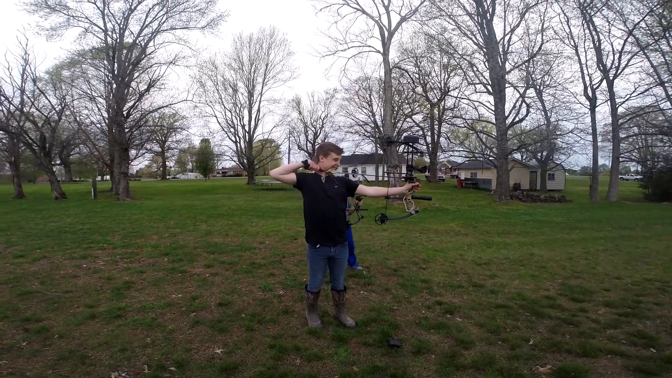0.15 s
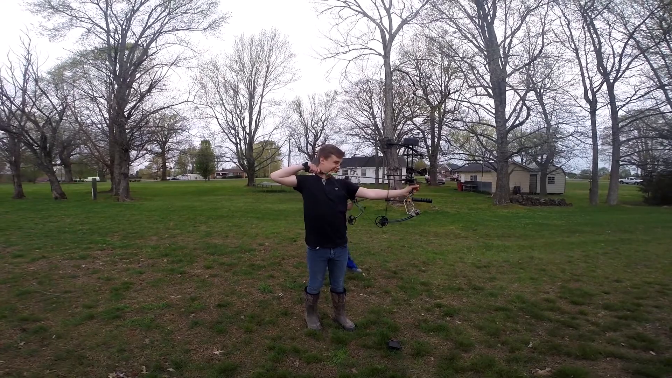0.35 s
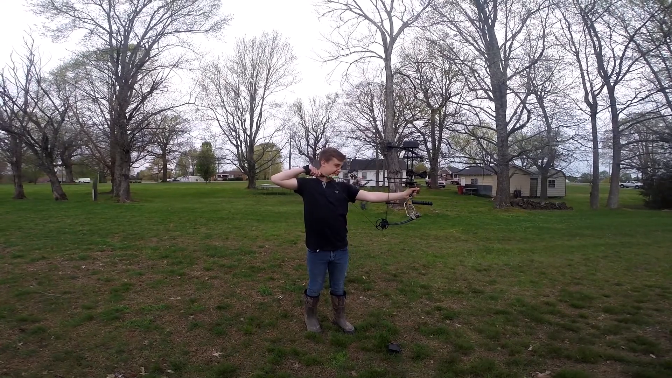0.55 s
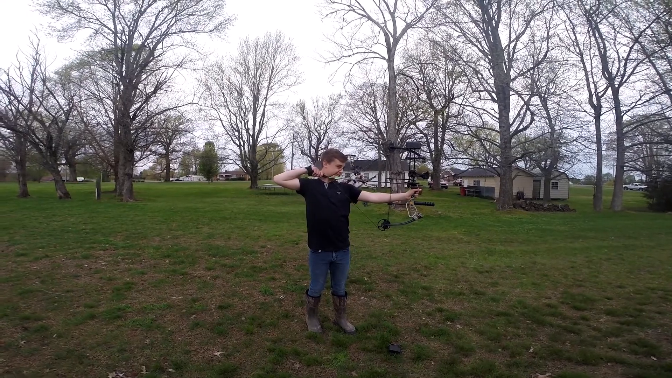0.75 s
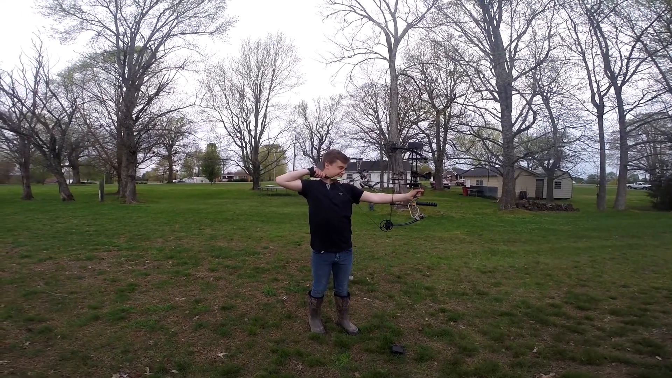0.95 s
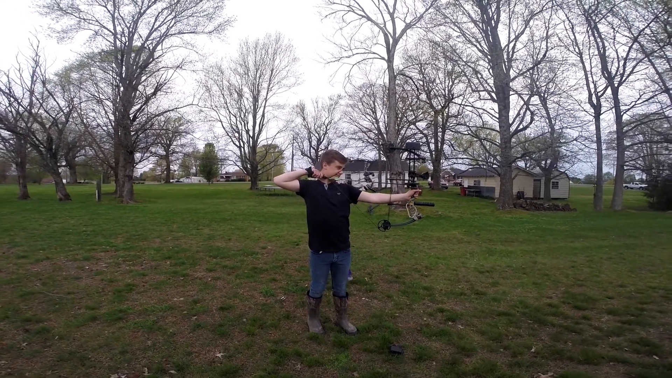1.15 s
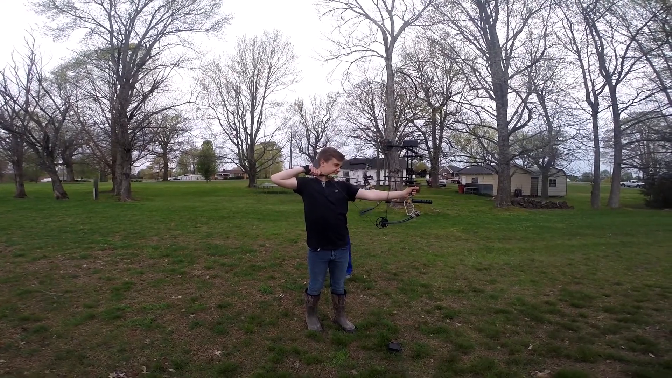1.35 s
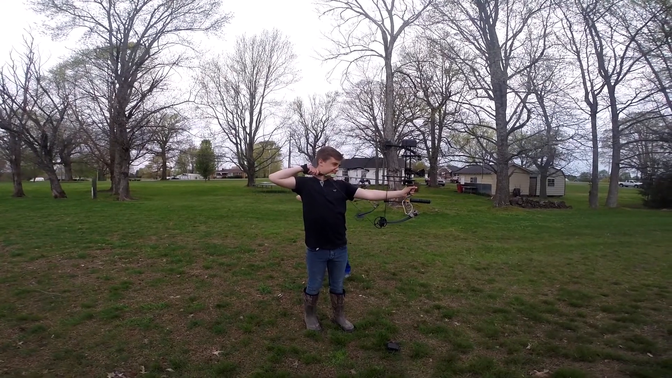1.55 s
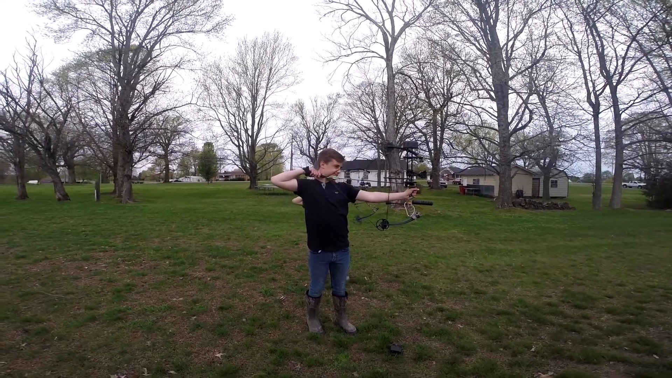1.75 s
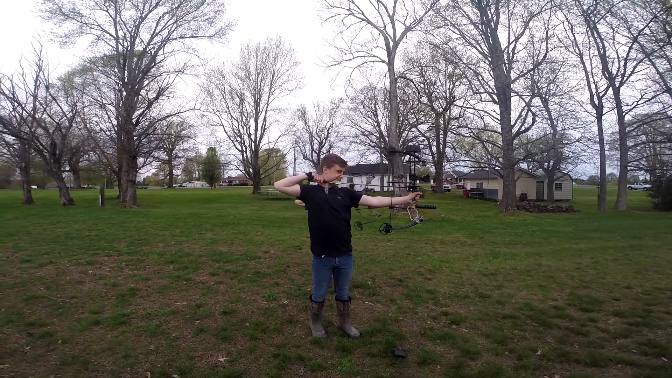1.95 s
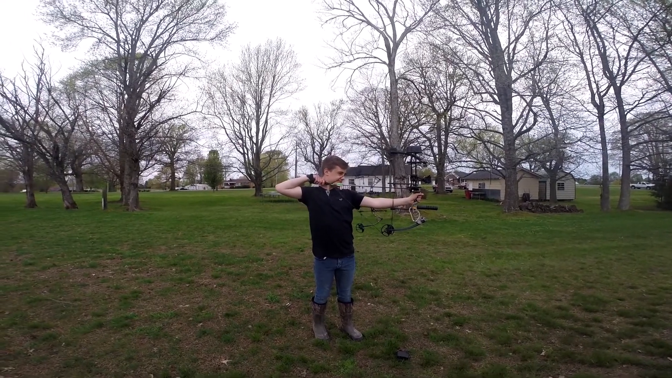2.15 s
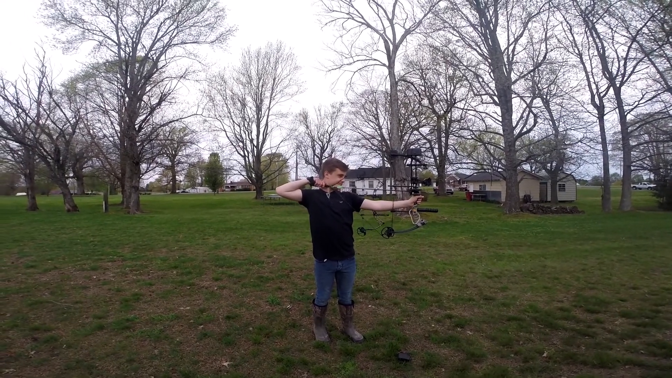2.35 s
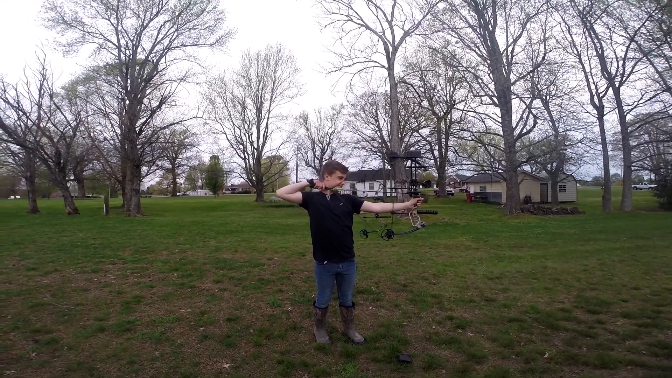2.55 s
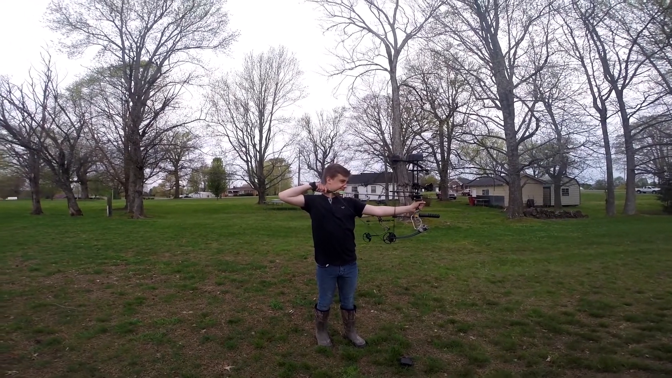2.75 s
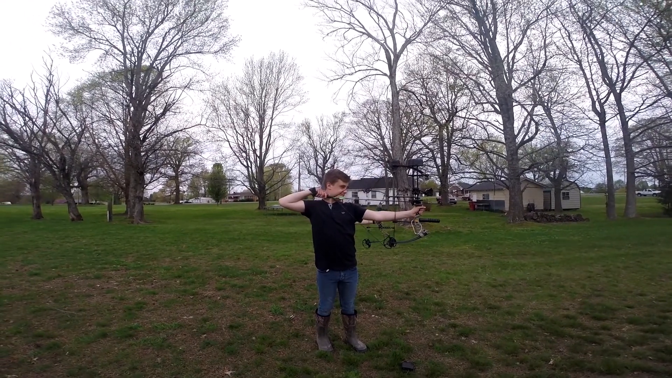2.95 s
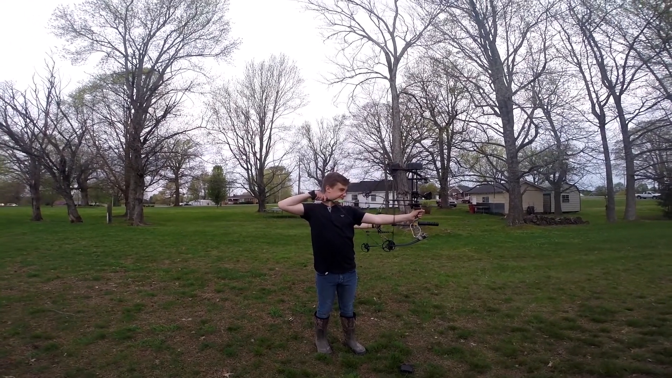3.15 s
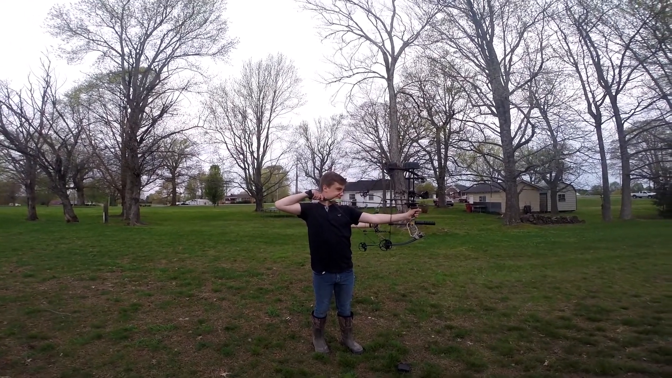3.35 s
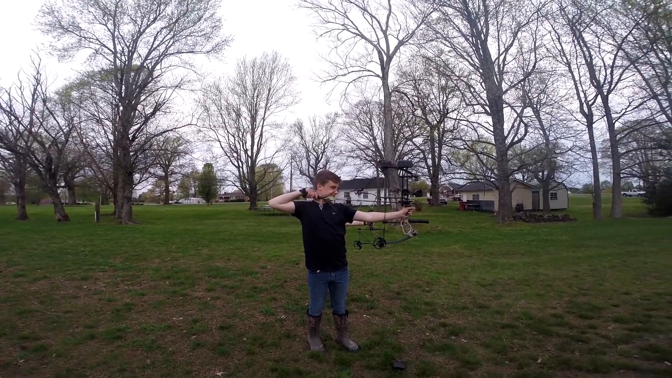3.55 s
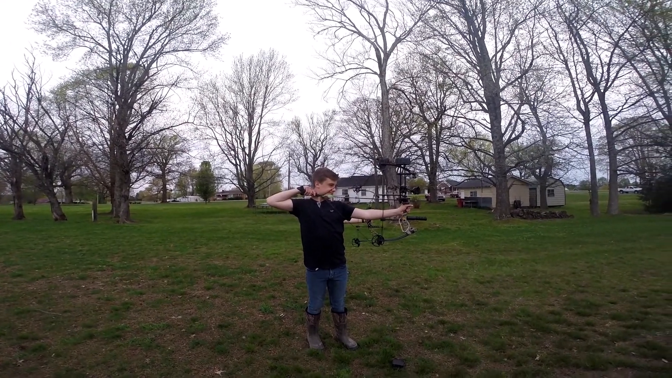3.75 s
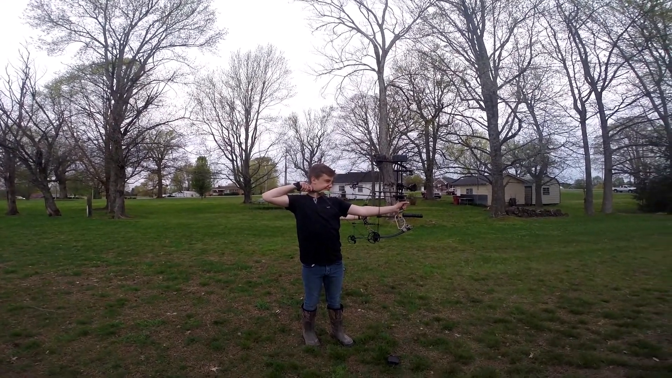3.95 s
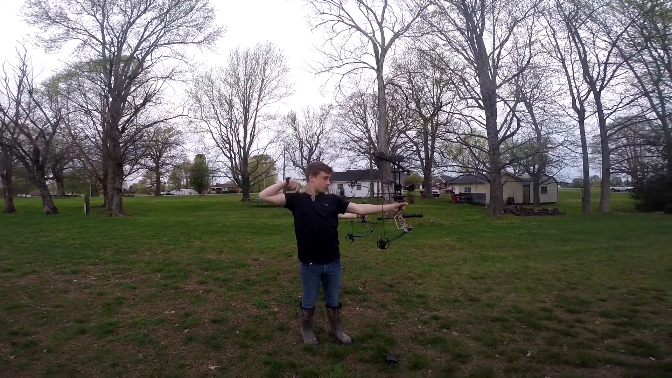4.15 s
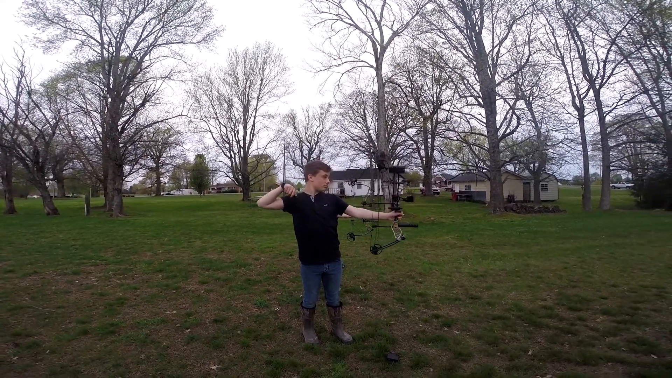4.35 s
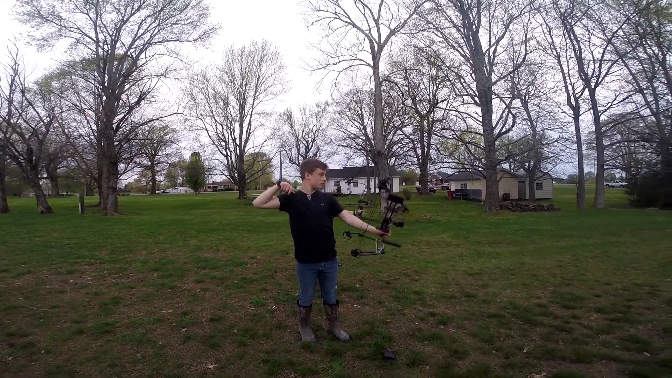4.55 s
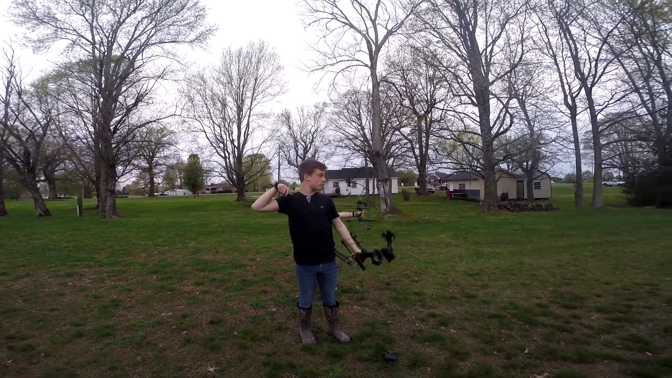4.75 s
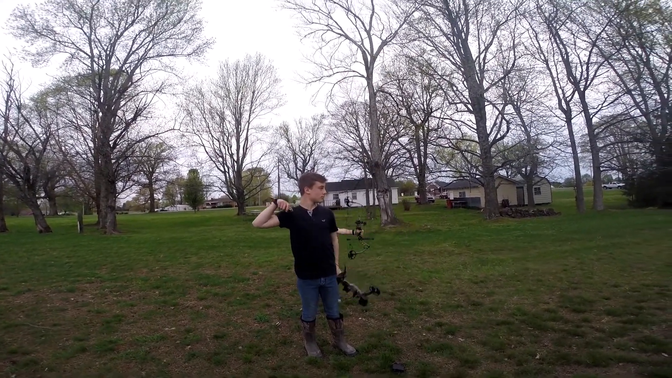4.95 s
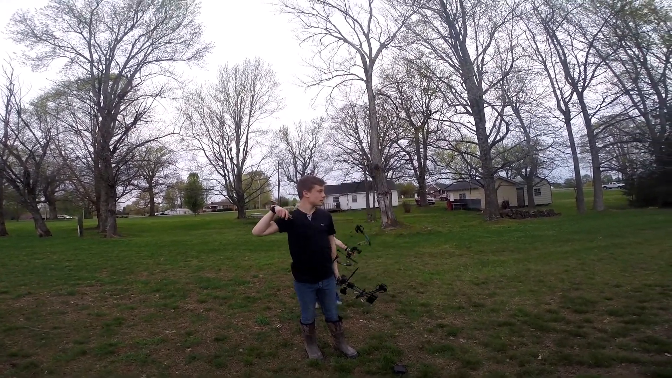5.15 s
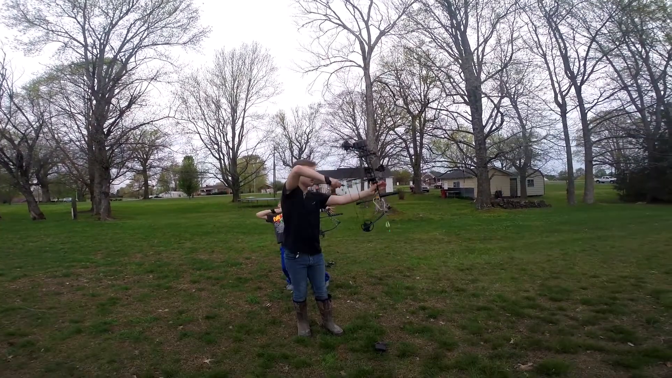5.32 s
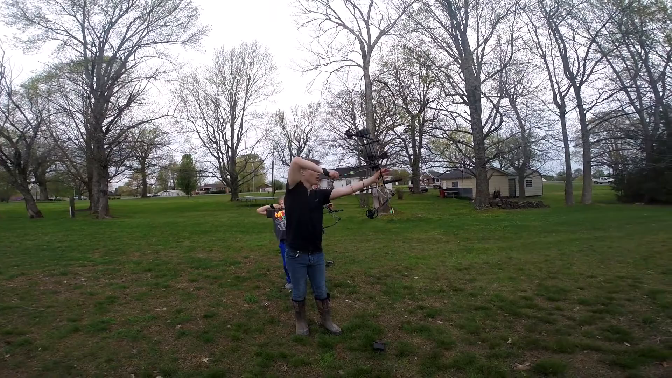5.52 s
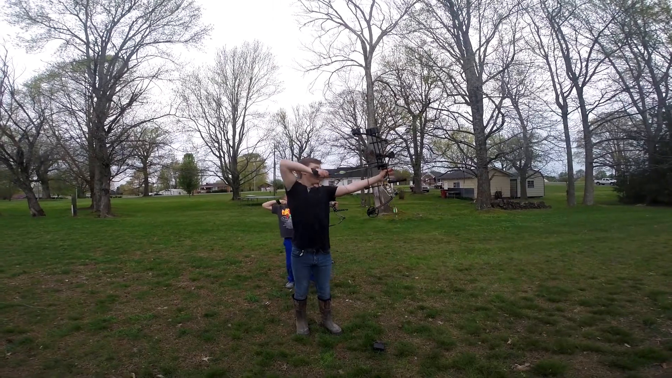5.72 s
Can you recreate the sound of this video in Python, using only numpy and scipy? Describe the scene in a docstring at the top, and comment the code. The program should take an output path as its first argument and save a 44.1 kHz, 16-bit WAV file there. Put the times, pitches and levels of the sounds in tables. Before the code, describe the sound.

A quiet open lawn: steady low rumble and soft midrange roar of distant traffic, swelling at the start and again around 1.4 s, with faint hiss and a barely audible high electronic whine. A sharp knock sounds close to the microphone at 0.05 s, more ticks and a small rustle near 0.95 s, and a cluster of clicks around 2.8 s. Small birds chip and whistle downward slurs; a rolling song repeats four times from 1.75 to 3 s. At 4.18 s a bow releases with a loud, hard slap, rattling and rebounding, leaving a short hum and scattered outdoor echoes. Its arrow hits a target at 4.45 s with a punchy thud. A second bow snaps at 4.8 s, quieter and tighter, and its arrow cracks home at 5.14 s. Sound immediately drops nearly to silence, returns around 5.25 s and creeps back up to background, with a tiny tick near 5.67 s.

```python
"""Two bow shots on a lawn

Two compound bows are released in turn: each slap rings limb modes, leaves a hum and shakes a noise rattle. Each
arrow thuds into a target down range: a push-and-spring pulse, cracks, short rings and echoes. Distant traffic
is shaped noise, birds are gliding sines; something small ticks and knocks near the microphone, and a release
aid clicks just before the first shot; the microphone's electronics whine faintly. After the last thud the sound
drops out and creeps back."""
import sys
import numpy as np
from scipy import signal
from scipy.fft import rfft, irfft
from scipy.io import wavfile
from scipy.ndimage import uniform_filter1d

SR = 44100
rng = np.random.default_rng(int(sys.argv[2]) if len(sys.argv) > 2 else 0)


def transcribe(signal):
    """Save signal, clipped to [-1, 1], as a 16-bit WAV file at the path in sys.argv[1]."""
    frames = np.atleast_2d(signal).T
    limited = np.clip(frames, -1, 1)
    pcm = np.round(limited * 32767).astype(np.int16)
    wavfile.write(sys.argv[1], SR, pcm)


N = 259286
TIME_S = np.arange(N) / SR

# background and hiss spectra, relative: freq_hz, density_db_per_hz
ROAR_SPECTRUM = [(700, -26), (950, -1), (1100, 1), (1300, 2.5), (1550, -4), (2000, -57.5)]
RUMBLE_SPECTRUM = [(20, -12.5), (40, -5), (70, 0), (115, 4), (160, -4.5), (250, -9.5), (400, -15.5),
                   (700, -40)]
SWISH_SPECTRUM = [(1200, -22.5), (1700, 8), (2400, 0.5), (3300, -3.5), (5000, -20), (9000, -31)]
DRONE_SPECTRUM = [(220, -24.5), (400, -10), (520, -4.5), (650, -2), (850, 1.5), (1100, -5.5)]
HISS_SPECTRUM = [(2000, -12), (5000, 5), (9000, -8), (12000, -12), (14800, -11), (16000, -22)]
# steady background and hiss levels, rms
ROAR_DB, RUMBLE_DB, SWISH_DB, DRONE_DB, HISS_DB = -51.5, -46, -58.5, -52.5, -67
# broad swells in the background: far vehicles, and a low tail after the first shot:
# centre_s, half_length_s, roar_gain_db, rumble_gain_db, swish_gain_db, drone_gain_db
SWELLS = [(0.0, 0.29, 6.5, 2.5, 3, 1), (1.4, 0.63, 4.5, -0.5, 1.5, 1), (1.887, 0.15, -2, 0.5, 3.5, 0.5),
          (3.047, 0.56, 1, -1, 4.5, -2.5), (4.56, 0.22, 0, 3.5, -1, 1.5), (5.0, 0.18, 0, 1.5, 3.5, -1),
          (5.85, 0.48, -1, -1, -1.5, 5.5)]
# microphone electronics: freq_hz, rms_db
WHINE = [(5860, -79.5), (8790, -88.5), (11719, -79.5), (14626, -79.5)]

# ticks and knocks (the two at 4.161 and 4.165 s are the release aid clicking before the first slap): # start_s,
# level_db, freq_hz, second_freq_hz, second_level_db, length_s
TICKS = [(0.0483, -15.5, 940, 3460, -21, 0.0026), (.049, -26.5, 2430, 6050, -42, 0.0037),
         (0.39, -39, 13000, 8500, -42, 0.0008), (0.923, -40, 4560, 8000, -62, 0.0024),
         (0.935, -39, 4000, 5700, -53, 0.0085), (0.942, -29, 4420, 5840, -39, 0.0028),
         (0.9493, -20.5, 1315, 4040, -21, 0.0038), (.95, -18, 5340, 11650, -37, 0.0045),
         (1.056, -44, 3500, 5070, -43.5, 0.0015), (1.733, -30.5, 2850, 3660, -34.5, 0.0046),
         (2.727, -35, 7700, 5530, -50, 0.0019), (2.78, -35.5, 4960, 7000, -56, 0.0037),
         (2.79, -48, 5500, 8000, -55, 0.0018), (2.8156, -19, 4720, 10700, -45, 0.0015),
         (2.8285, -42, 7800, 12400, -49, 0.0016), (2.8473, -25, 7420, 4750, -34, 0.0011),
         (2.8553, -27.5, 3260, 2020, -36, 0.0035), (2.8577, -42, 7400, 5570, -43, 0.0037),
         (3.035, -35, 4320, 12700, -56, 0.0021), (3.2835, -53, 12000, 9500, -59, 0.0015),
         (4.161, -36, 7400, 14300, -42, 0.007), (4.165, -41, 7100, 8900, -56, 0.0092),
         (5.671, -46, 3200, 4800, -47, 0.0024)]
# brief rustles near the microphone: start_s, length_s, freq_hz, rms_db
RUSTLES = [(0.499, 0.031, 6500, -63.5), (0.913, 0.05, 4230, -54.5), (0.941, 0.013, 5000, -46),
           (2.884, 0.072, 4670, -60.5), (5.246, 0.042, 4000, -52)]

# one turn of a rolling song, one list per note: time_in_turn_s, pitch_hz
SONG_TURN = [
    [(0, 2870), (.04, 2856)],
    [(.05, 3330), (.065, 3050), (.1, 2945)],
    [(.105, 2460), (.122, 2520), (.13, 3060)],
    [(.128, 2840), (.136, 3350), (.15, 3585)],
    [(.15, 3504), (.2, 3604), (.24, 3570)],
]
# one per note of the turn: gain_db
SONG_NOTE_GAINS = [1.8, 2.5, 1.6, 11.7, 4]
SONG_START_S, TURN_EVERY_S, TURN_COUNT = 1.752, 0.321, 4
SONG_DB, SONG_GROWTH_DB_PER_TURN = -61.5, 0.5
# slurred whistles of other birds: start_s, length_s, from_hz, to_hz, rms_db
SLURS = [(0.2, 0.075, 5400, 4070, -70), (0.815, 0.077, 4600, 3880, -61.5), (1.363, 0.09, 5550, 3850, -63),
         (1.905, 0.083, 5300, 3780, -57.5), (2.344, 0.051, 6500, 4320, -65.5),
         (2.664, 0.05, 6500, 4300, -66), (2.974, 0.021, 4240, 3560, -68), (3.018, 0.023, 3020, 3630, -61),
         (3.168, .035, 3240, 3050, -61), (3.332, 0.034, 4500, 3620, -68), (3.384, 0.018, 3210, 4100, -59.5),
         (3.533, 0.026, 3240, 3090, -58.5), (3.705, 0.045, 4300, 3420, -61),
         (3.749, 0.025, 3100, 3800, -61)]
STRAIGHT_S = 0.035   # longer slurs flatten out towards their end
# chips of one more bird: start_s, rms_db
CHIPS = [(.085, -70), (.368, -69), (.46, -73), (.558, -75), (.647, -68)]
CHIP_S, CHIP_FROM_HZ, CHIP_TO_HZ = 0.022, 4650, 4800
FLUTTER_DB, FLUTTER_HZ = 3.5, 70
LEAF_ECHO_DB, LEAF_LOSS_DB_PER_S = -19, 100

# bows let go: slap_s, thump_db, rattle_db, first_touch_lead_s, rebound_every_s,
# thump_loss_db_per_rebound, rattle_loss_db_per_rebound, tail_db, tail_treble_db_per_octave (above 1 kHz)
RELEASES = [(4.1775, -17, -23, 0.00314, .012, 5, 4, -7, -0.5),
            (4.8038, -22.5, -31, 0.0038, 0.0073, 15, 10, -18, 4)]
# limb modes: freq_hz, level_db, t60_s
LIMBS = [(230, -8.5, 0.054), (320, -8, .04), (400, 0, .07), (557, -7.5, .045), (743, -6.5, 0.049),
         (900, -1, 0.034), (997, -1.5, 0.05), (1107, -2.5, .05), (1494, -9.5, 0.034)]
# cam resonances: freq_hz, width_hz, level_db
CAMS = [(1930, 1040, 0.5), (3140, 980, 1.5), (4600, 1060, -0.5), (5880, 700, 2), (8350, 890, -7.5),
        (13500, 5600, -27.5)]
# hum after each slap, one row per release: freq_hz, level_db, t60_s
HUMS = [(466, -22.5, .25), (454, -23.5, .12)]
TOUCH_THUMP_DB, TOUCH_RATTLE_DB = -15.5, -13   # first touch, relative to the slap
SECOND_CAM_LAG_S, SECOND_CAM_THUMP_DB = 0.00208, -11
REBOUNDS, REBOUND_JITTER_S = 6, 0.0008
HALF_BEAT_DB = -8   # a weaker touch midway between rebounds
CONTACT_S, RATTLE_RISE_S, RATTLE_T60_S = 0.00018, 0.00056, 0.049
HUM_RISE_S = 0.05

# echoes from trees and houses: band_hz, level_db, t60_s
TAIL = [(406, -32.5, 0.37), (914, -30, 0.37), (2590, -47.5, 0.98), (6000, -54, 0.73)]
TAIL_DELAY_S = 0.011

# arrows in the target: start_s, push_db, ring_db, crack_hz, crack_db, second_crack_hz, second_crack_db,
# tail_db, tail_treble_db_per_octave (above 1 kHz)
THUDS = [(4.4527, -8.5, -18.5, 1930, -10, 3570, -18.5, -6.5, -0.5),
         (5.1442, -13, -15, 3650, -17.5, 8230, -8.5, -14, 2)]
# target modes: freq_hz, level_db, t60_s
TARGET = [(223, -22, 0.069), (414, -6.5, 0.041), (544, -11, 0.038), (928, -7.5, 0.038), (6540, -10, .003)]
# near echoes of the thud: lag_s, level_db
ECHOES = [(.007, -15.5), (0.033, -25.5), (0.038, -29)]
PUSH_S, SPRING_S = 0.0011, 0.00098

# the level drops, sinks further, snaps most of the way back and creeps up the rest
DROP_S, FALL_S, DROP_DB, SINK_DB = 5.169, 0.0086, -30, -62
RETURN_S, RISE_S, SHORT_DB, CREEP_S = 5.238, 0.026, -7, 0.29
CUTOFF_HZ = 16500


def amp(db):
    """Decibels to gain."""
    return 10 ** (np.asarray(db) / 20)


def rms_one(x):
    """Scale to rms 1."""
    return x / np.sqrt(np.mean(x ** 2) + 1e-20)


def coloured(spectrum):
    """Gaussian noise shaped to a spectrum on a log frequency axis; rms 1."""
    hz, db = np.transpose(spectrum)
    bins_hz = np.maximum(np.arange(N // 2 + 1) * SR / N, 1)
    shape_db = np.interp(np.log(bins_hz), np.log(hz), db, left=-80, right=-80)
    return rms_one(irfft(rfft(rng.standard_normal(N)) * amp(shape_db), N))


def drift(rate_hz):
    """Slow random wander: twice low-passed noise, rms 1."""
    r = np.exp(-2 * np.pi * rate_hz / SR)
    # the first second settles the filter
    return rms_one(signal.lfilter([1], [1, -2 * r, r * r], rng.standard_normal(N + SR))[SR:])


def clicks(times_s, levels_db):
    """Single-sample click train."""
    out = np.full(N, 1e-18)   # tiny floor keeps filters off denormals
    out[(np.asarray(times_s) * SR).astype(int)] = amp(levels_db)
    return out


def ring(x, hz, t60_s):
    """Two-pole mode: a unit click starts a decaying sine of height about 1."""
    r, w = amp(-60 / (t60_s * SR)), 2 * np.pi * hz / SR
    return signal.lfilter([0, np.sin(w)], [1, -2 * r * np.cos(w), r * r], x)


def fade(x, t60_s):
    """Each click becomes an exponentially dying envelope."""
    return signal.lfilter([1], [1, -amp(-60 / (t60_s * SR))], x)


def soften(x, length_s):
    """Spread each click over a Hann-shaped contact time."""
    window = np.hanning(int(length_s * SR) + 3)
    return np.convolve(x, window / window.sum())[:N]


def resonance(x, hz, width_hz):
    """Two-pole band-pass, peak gain about 1."""
    r = np.exp(-np.pi * width_hz / SR)
    poles = [1, -2 * r * np.cos(2 * np.pi * hz / SR), r * r]
    return signal.lfilter([(1 - r * r) / 2, 0, (r * r - 1) / 2], poles, x)


def add(out, start_s, x):
    """Mix x into out from start_s."""
    at = int(start_s * SR)
    out[at:at + len(x)] += x


def background():
    """Noise layers swell broadly and their levels flicker; hiss is steady, whine sines flicker too."""
    centre_s, half_s, *gains_db = np.transpose(SWELLS)
    swell = np.exp(-((TIME_S[:, None] - centre_s) / half_s) ** 2)
    levels_db = (ROAR_DB, RUMBLE_DB, SWISH_DB, DRONE_DB)
    spectra = (ROAR_SPECTRUM, RUMBLE_SPECTRUM, SWISH_SPECTRUM, DRONE_SPECTRUM)
    out = amp(HISS_DB) * coloured(HISS_SPECTRUM)
    for db, gain_db, spectrum in zip(levels_db, gains_db, spectra):
        out += amp(db + swell @ gain_db + 1.25 * drift(8.5)) * coloured(spectrum)
    for hz, db in WHINE:
        out += np.sqrt(2) * amp(db + 1.5 * drift(23)) * np.sin(2 * np.pi * hz * TIME_S)
    return out


def ticks():
    """Each tick is two short sines under one roughened pulse; rustles are puffs of grainy noise."""
    out = np.zeros(N)
    t = TIME_S[:900]
    for start_s, db, hz, second_hz, second_db, length_s in TICKS:
        body = amp(db) * np.sin(2 * np.pi * hz * t)
        body += amp(second_db) * np.sin(2 * np.pi * second_hz * t)
        smooth = uniform_filter1d(rng.standard_normal(len(t)), size=12)
        rough = 1 + 0.4 * rms_one(uniform_filter1d(smooth, size=12))
        shape = np.sin(np.pi * np.clip(t / length_s, 0, 1) ** 0.6) ** 2   # rises faster than it falls
        add(out, start_s, body * rough * shape)
    for start_s, length_s, hz, db in RUSTLES:
        count = int(length_s * SR)
        grains = rng.standard_normal(count) * amp(3.3 * rng.standard_normal(count))
        band = rms_one(resonance(resonance(grains, hz, hz), hz, hz))
        add(out, start_s, amp(db) * band * signal.windows.tukey(count, 0.5))
    return out


def whistle(pitch_hz, db):
    """Near sine on a slightly unsteady pitch track, soft at both ends."""
    wobble = rms_one(uniform_filter1d(rng.standard_normal(len(pitch_hz)), size=200))
    phase = 2 * np.pi * np.cumsum(pitch_hz + 45.0 * wobble) / SR
    return np.sqrt(2) * amp(db) * np.sin(phase) * signal.windows.tukey(len(pitch_hz), 0.3)


def birds():
    """A rolling song repeats its turn; slurs and chips glide between two pitches; leaves smear them all."""
    out = np.zeros(N)
    for turn in range(TURN_COUNT):
        turn_s = SONG_START_S + turn * TURN_EVERY_S
        turn_db = SONG_DB + turn * SONG_GROWTH_DB_PER_TURN
        for note, gain_db in zip(SONG_TURN, SONG_NOTE_GAINS):
            s, hz = np.transpose(note)
            pitch_hz = np.interp(np.arange(s[0], s[-1], 1 / SR), s, hz)
            add(out, turn_s + s[0], whistle(pitch_hz, turn_db + gain_db))
    chips = [(start_s, CHIP_S, CHIP_FROM_HZ, CHIP_TO_HZ, db) for start_s, db in CHIPS]
    for start_s, length_s, from_hz, to_hz, db in SLURS + chips:
        left = np.linspace(1, 0, int(length_s * SR)) ** max(length_s / STRAIGHT_S, 1)
        add(out, start_s, whistle(to_hz + (from_hz - to_hz) * left, db))
    out = out * amp(FLUTTER_DB * drift(FLUTTER_HZ))
    lags_s = rng.uniform(0.0026, 0.07, size=24)
    smear = sum(amp(LEAF_ECHO_DB - LEAF_LOSS_DB_PER_S * lag) * np.roll(out, int(lag * SR)) for lag in lags_s)
    return out + smear


def slaps():
    """First touch, slap of both cams, dying rebounds: rows of time_s, thump_db, rattle_db."""
    rows = []
    for slap_s, thump_db, rattle_db, lead_s, every_s, thump_loss_db, rattle_loss_db, *_ in RELEASES:
        rows.append((slap_s - lead_s, thump_db + TOUCH_THUMP_DB, rattle_db + TOUCH_RATTLE_DB))
        rows.append((slap_s, thump_db, rattle_db))
        rows.append((slap_s + SECOND_CAM_LAG_S, thump_db + SECOND_CAM_THUMP_DB, rattle_db))
        for k in np.arange(2, 2 * REBOUNDS + 1) / 2:
            weak_db = HALF_BEAT_DB * (k % 1 > 0)
            time_s = slap_s + k * every_s + rng.normal(0, REBOUND_JITTER_S)
            rows.append((time_s, thump_db - k * thump_loss_db + weak_db,
                         rattle_db - k * rattle_loss_db + weak_db))
    return rows


def bows():
    """Each slap rings the limbs, leaves a hum and shakes a grainy rattle out of the cams."""
    times_s, thump_db, rattle_db = np.transpose(slaps())
    spread_db = rng.normal(0, 1.24, (len(times_s), len(LIMBS)))
    thump = np.zeros(N)
    for k, (hz, db, t60_s) in enumerate(LIMBS):
        hits = clicks(times_s, thump_db + db + spread_db[:, k])
        thump += (-1) ** k * ring(hits, hz, t60_s)   # neighbouring modes swing in opposite sense
    # slim limbs radiate no deep bass
    thump = signal.sosfilt(signal.butter(2, 170, "high", fs=SR, output="sos"), thump)

    releases_s = [row[0] for row in RELEASES]
    hum = sum(ring(clicks([s], db), hz, t60_s) for s, (hz, db, t60_s) in zip(releases_s, HUMS))
    hum_rise = 1 - fade(clicks(releases_s, 0), HUM_RISE_S)

    grains = rng.standard_normal(N) * amp(1.4 * rng.standard_normal(N))
    bands = [(-1) ** k * amp(db) * resonance(grains, hz, width_hz) for k, (hz, width_hz, db) in enumerate(CAMS)]
    rattle_level = soften(fade(clicks(times_s, rattle_db), RATTLE_T60_S), RATTLE_RISE_S)
    return soften(thump, CONTACT_S) + hum * hum_rise + rms_one(sum(bands)) * rattle_level


def tails():
    """Scattered echoes swell after each release and thud, then die away band by band."""
    rows = [(row[0] + TAIL_DELAY_S, *row[-2:]) for row in RELEASES + THUDS]
    starts_s, tail_db, treble_db = np.transpose(rows)
    out = np.zeros(N)
    for hz, db, t60_s in TAIL:
        noise = resonance(rng.standard_normal(N), hz, 0.88 * hz)
        band = rms_one(resonance(noise, hz, 0.85 * hz))
        octaves = max(np.log2(hz / 1000), 0)
        starts = clicks(starts_s, db + tail_db + treble_db * octaves)
        out += band * soften(fade(starts, t60_s), 0.015)
    return out


def thuds():
    """The target face pushes out and springs back, cracks, and rings briefly; near surfaces echo it."""
    out = np.zeros(N)
    for s, db, ring_db, crack_hz, crack_db, second_hz, second_db, *_ in THUDS:
        add(out, s, amp(db) * np.bartlett(int(PUSH_S * SR)))
        add(out, s + 0.7 * PUSH_S, -1.25 * amp(db) * np.bartlett(int(SPRING_S * SR)))
        out += ring(clicks([s + 0.4 * PUSH_S], crack_db), crack_hz, 0.0055)
        out += ring(clicks([s + 1.14 * PUSH_S], second_db), second_hz, 0.0067)
        for hz, mode_db, t60_s in TARGET:
            out -= ring(clicks([s + 0.8 * PUSH_S], ring_db + mode_db), hz, t60_s)
    out = soften(out, 0.00016)
    dull = resonance(out, 900, 2000)
    return out + sum(amp(db) * np.roll(dull, int(lag_s * SR)) for lag_s, db in ECHOES)


def scene():
    """All sources, one channel."""
    return (background() + ticks() + birds() + bows() + tails() + thuds())[None]


def record(dry):
    """The level drops out once; a steep low-pass cuts the top."""
    back_s = RETURN_S + RISE_S
    times_s = [DROP_S, DROP_S + FALL_S, RETURN_S, back_s, back_s + CREEP_S]
    gain = amp(np.interp(TIME_S, times_s, [0, DROP_DB, SINK_DB, SHORT_DB, 0]))
    return signal.sosfilt(signal.cheby2(12, 70, CUTOFF_HZ, fs=SR, output="sos"), dry * gain)


dry = scene()
out = record(dry)
transcribe(out)
```